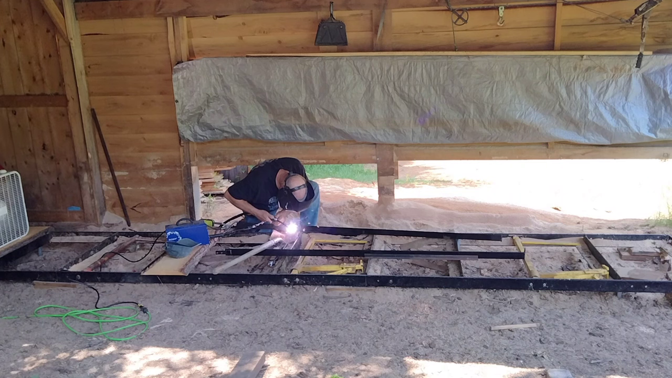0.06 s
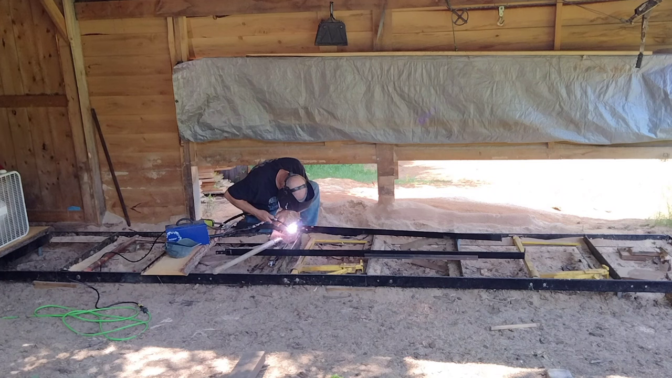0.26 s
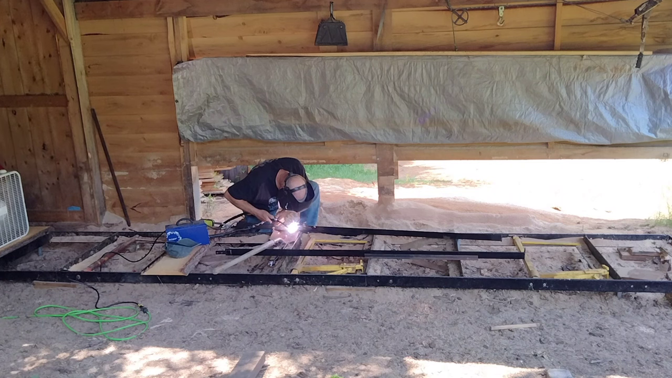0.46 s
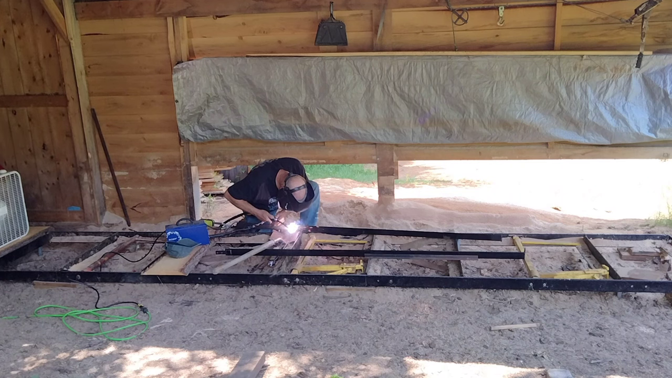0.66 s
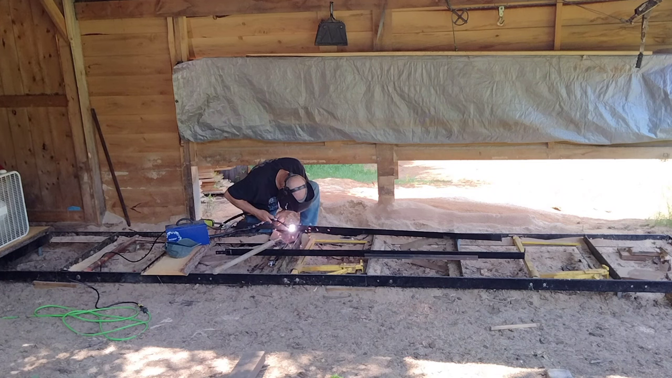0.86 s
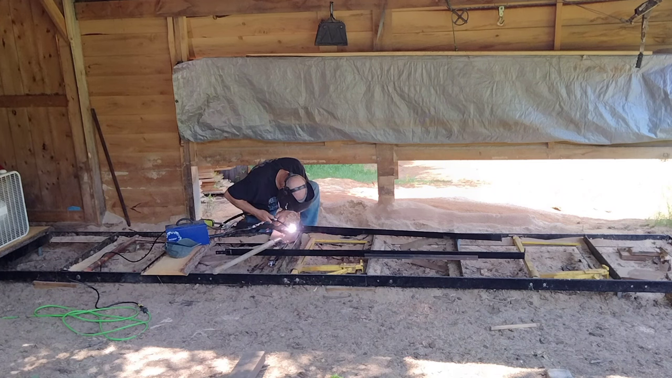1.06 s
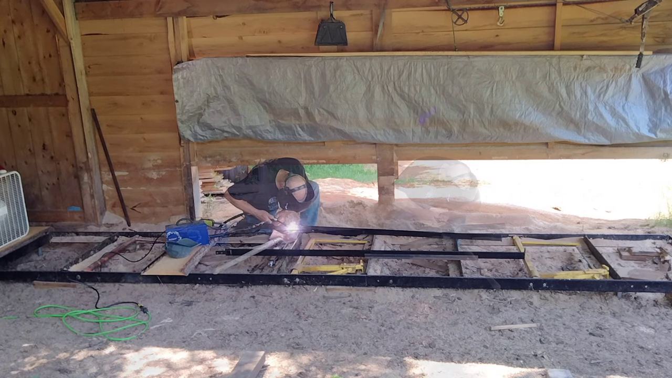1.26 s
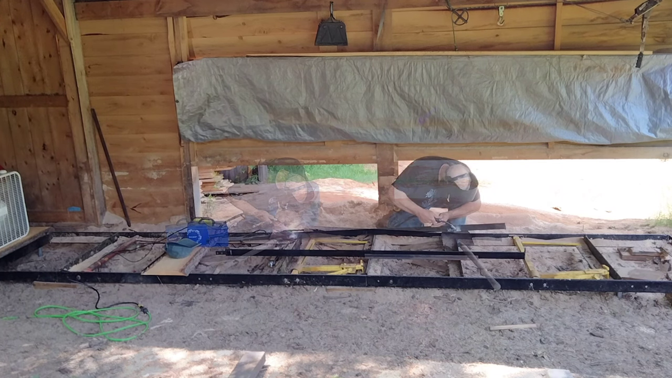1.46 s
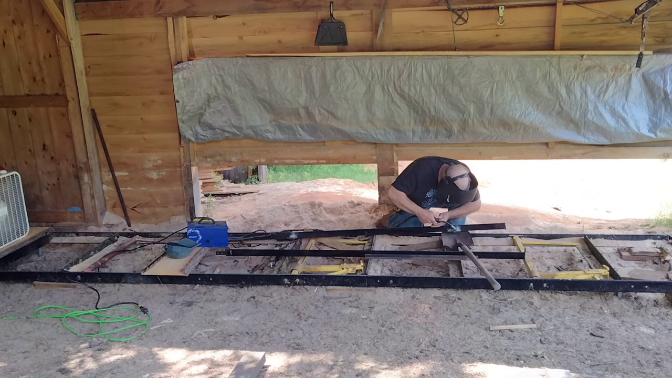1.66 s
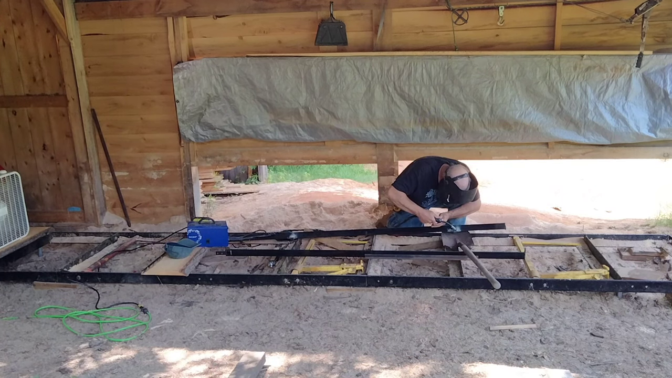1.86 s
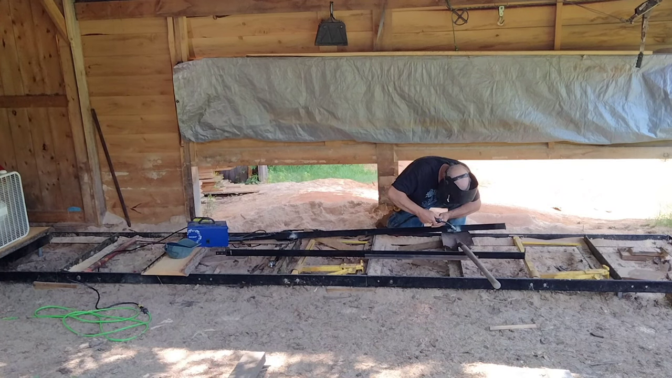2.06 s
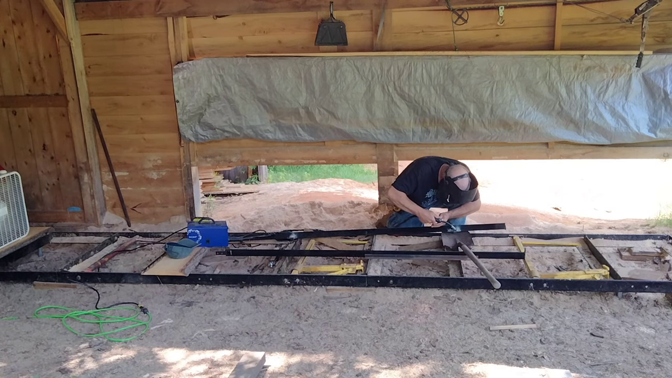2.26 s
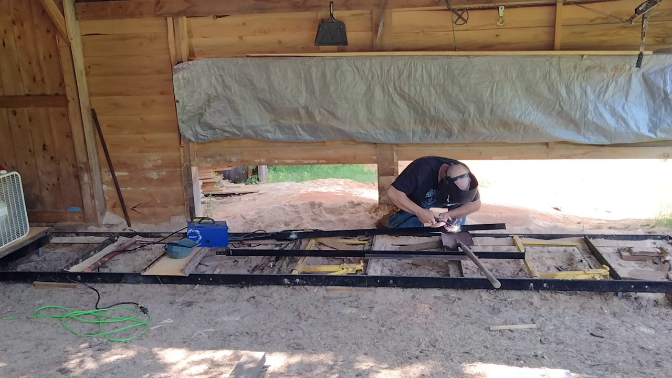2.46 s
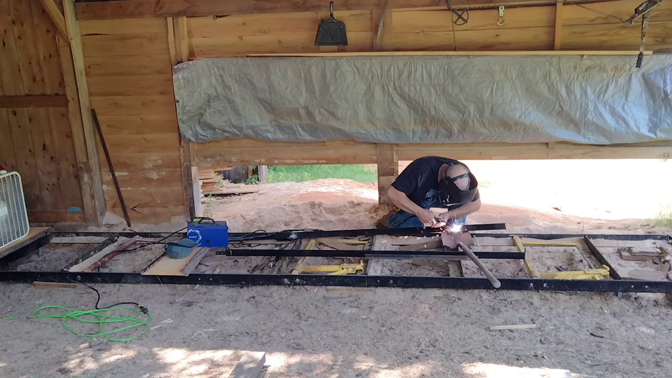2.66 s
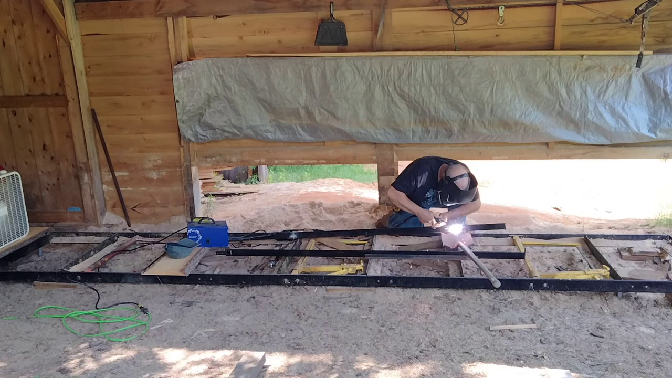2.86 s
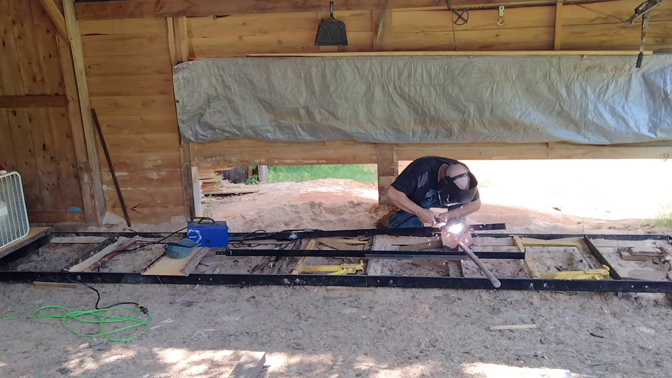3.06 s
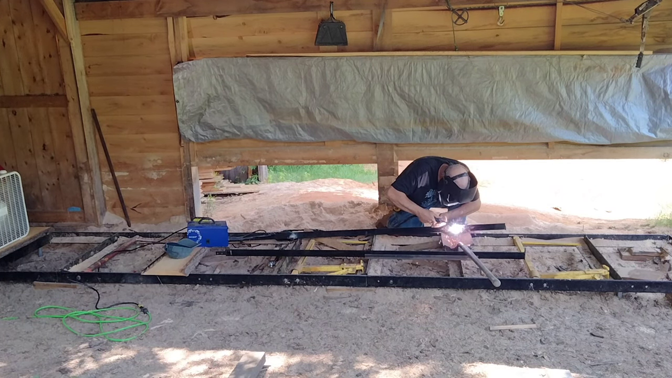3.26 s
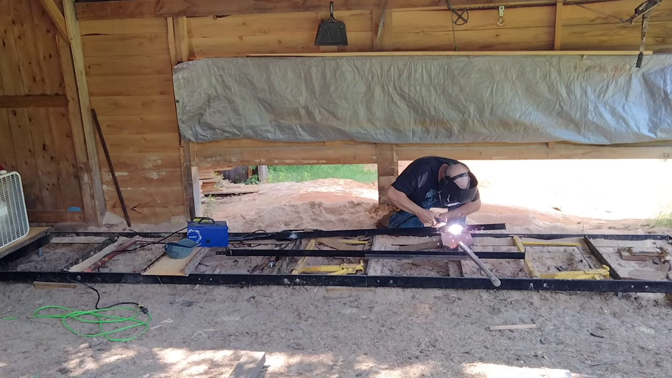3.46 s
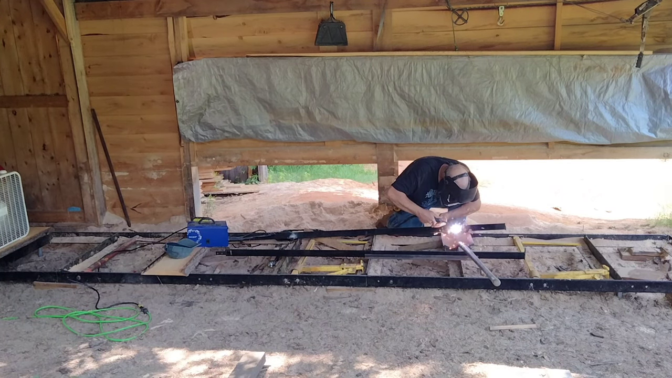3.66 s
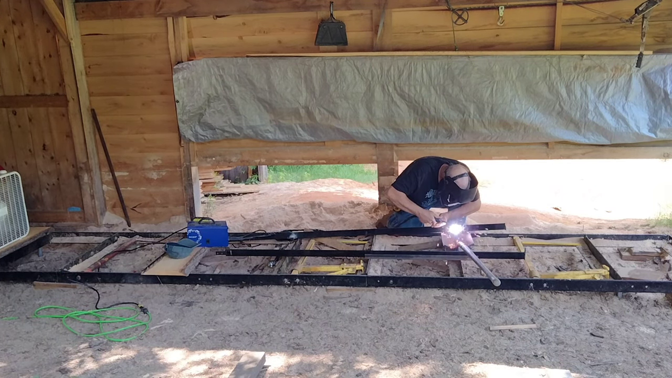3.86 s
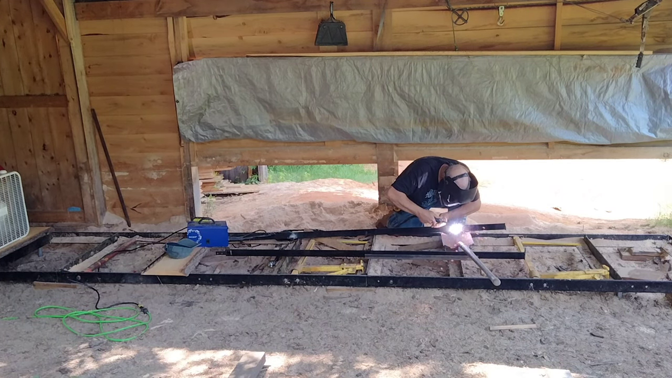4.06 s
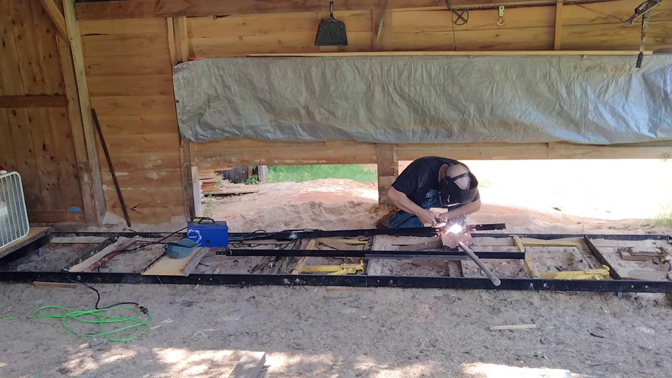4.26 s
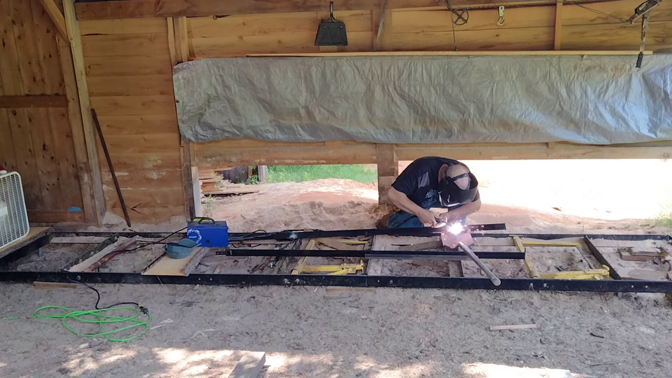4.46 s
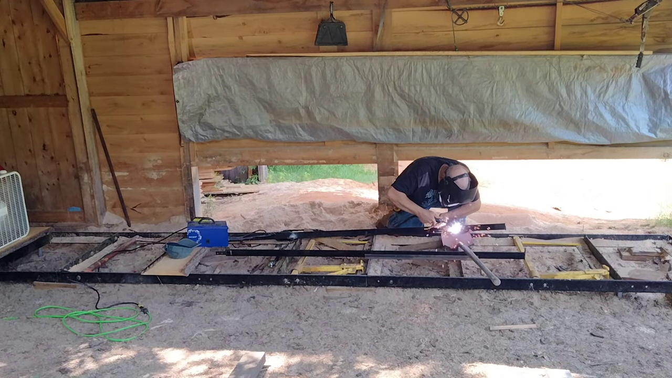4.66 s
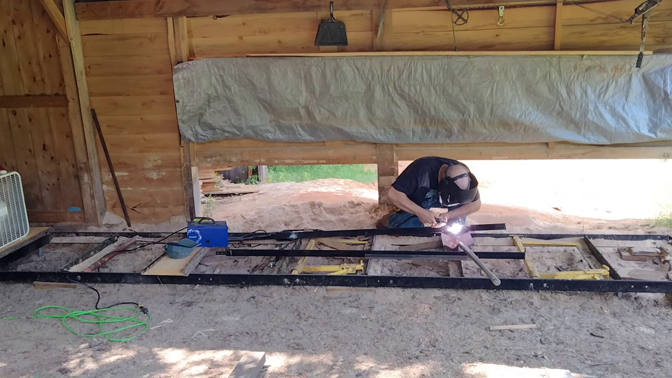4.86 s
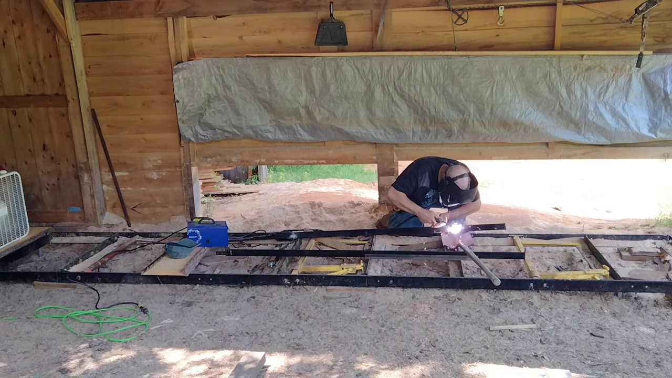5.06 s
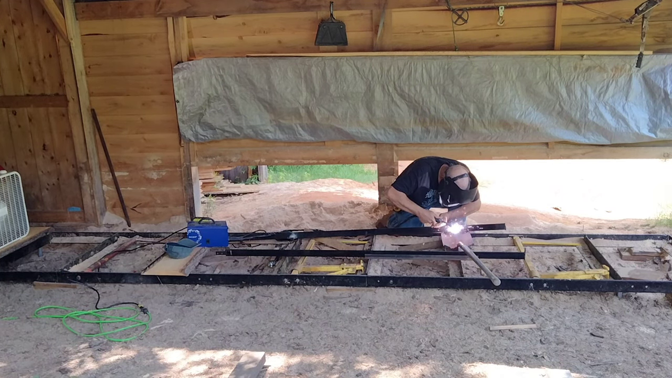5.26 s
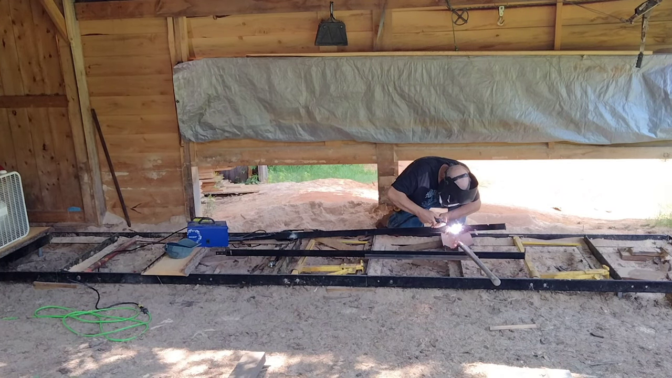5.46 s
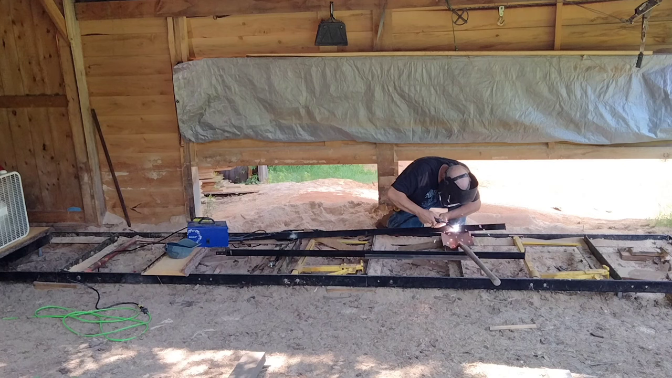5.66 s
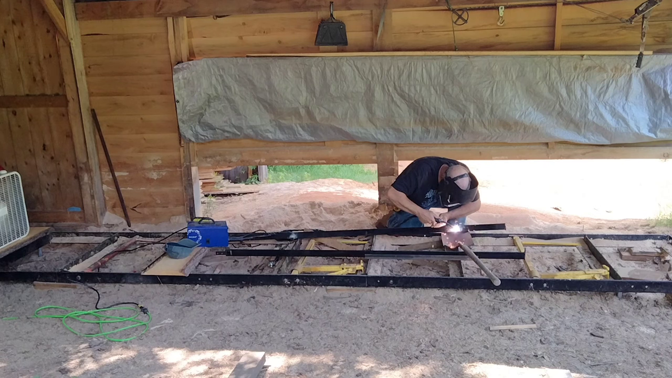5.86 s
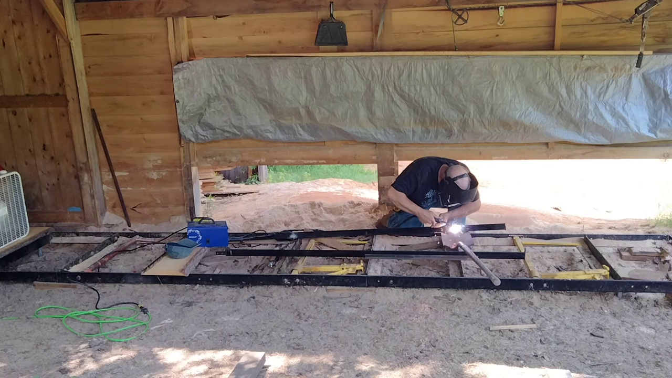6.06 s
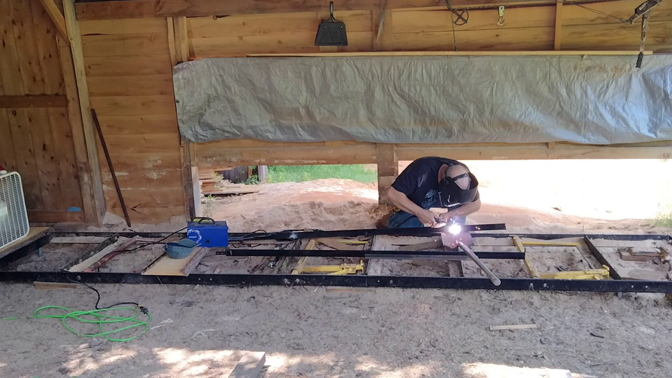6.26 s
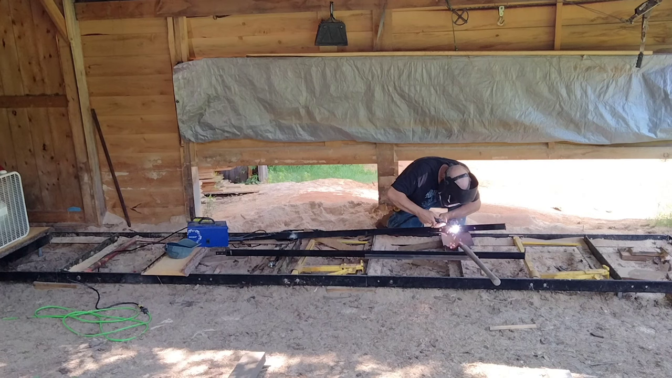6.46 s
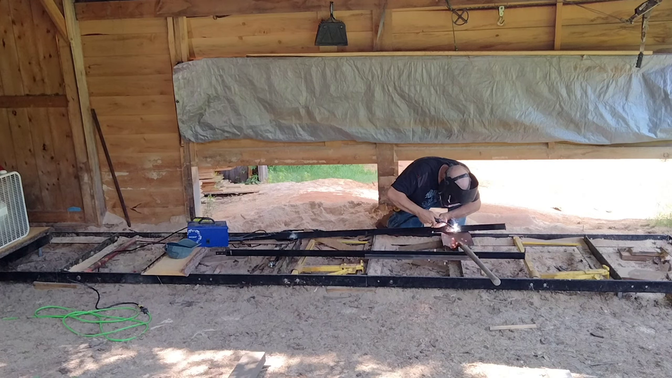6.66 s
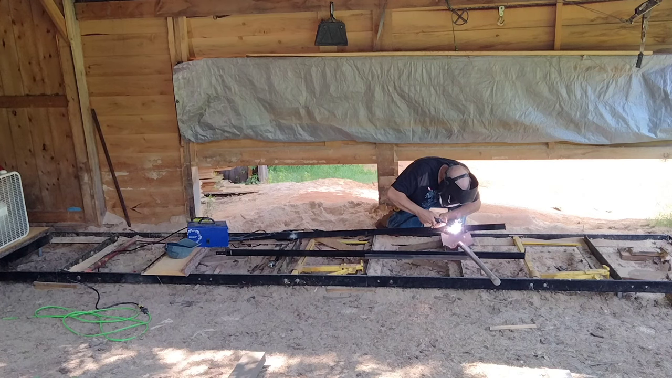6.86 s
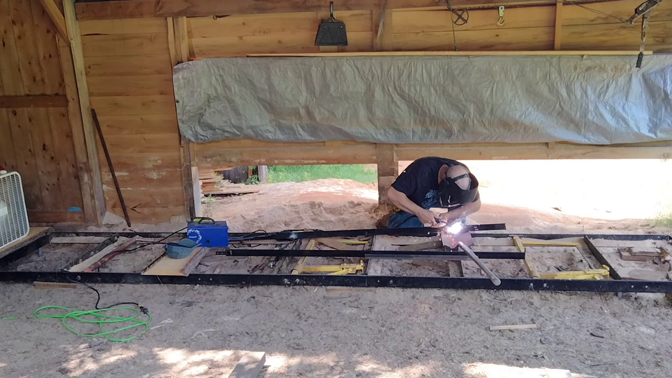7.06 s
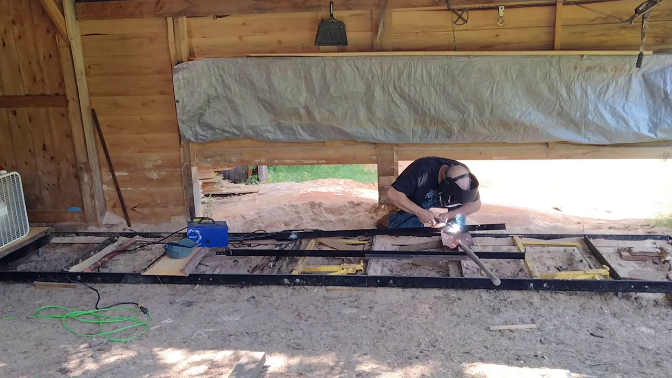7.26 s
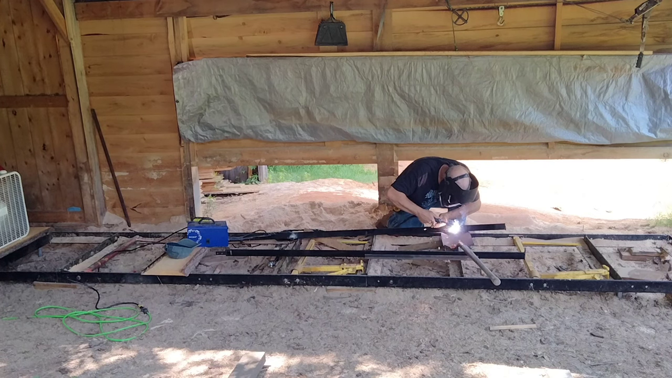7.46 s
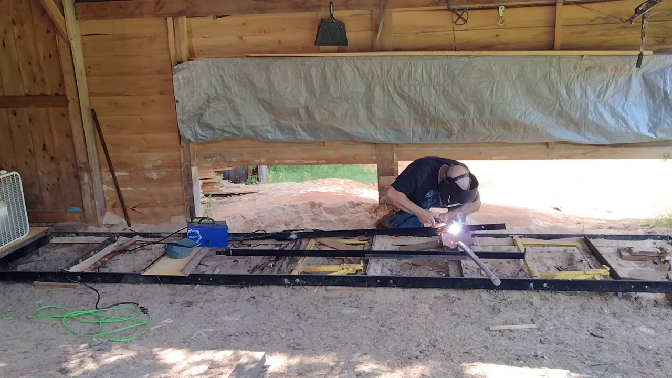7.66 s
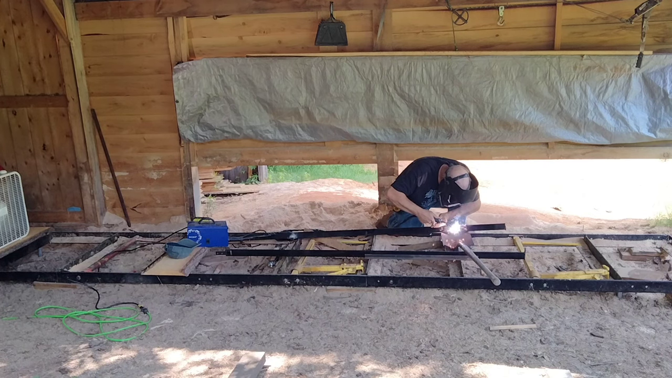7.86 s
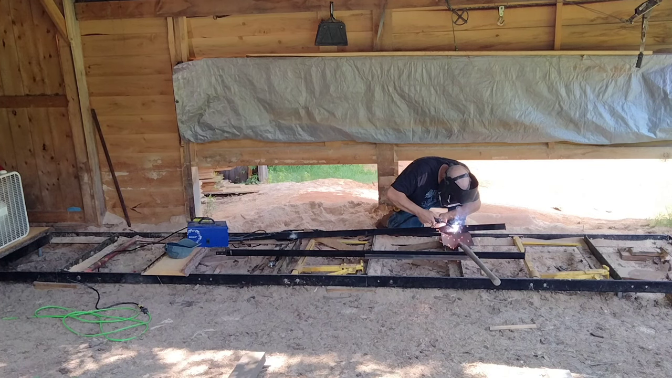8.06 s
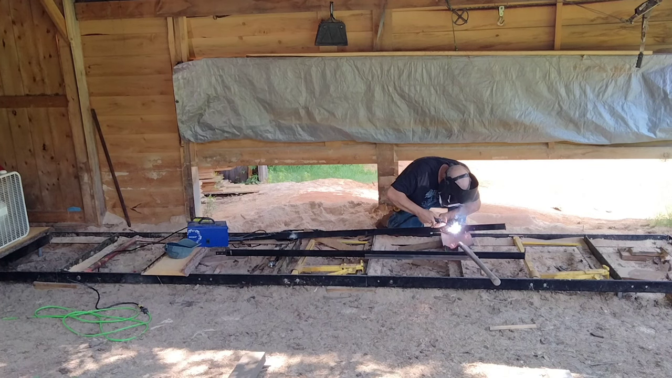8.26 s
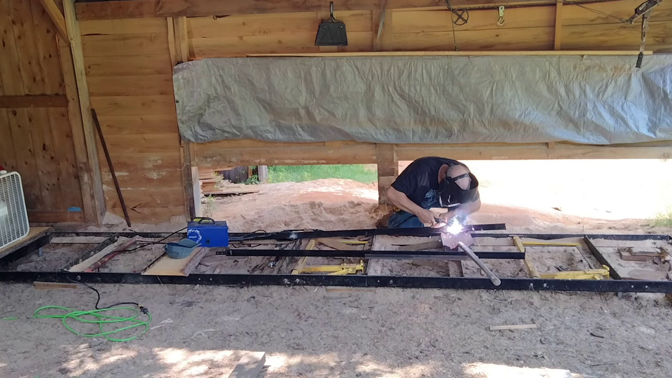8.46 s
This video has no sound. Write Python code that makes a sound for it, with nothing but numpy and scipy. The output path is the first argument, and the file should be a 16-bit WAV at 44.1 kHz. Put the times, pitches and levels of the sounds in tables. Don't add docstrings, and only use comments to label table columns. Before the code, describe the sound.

From the start a welding arc burns with a bright, uneven hiss, dense crackle and sharp little snaps; four tiny falling bird peeps come in the first 0.4 seconds. A low unsteady transformer hum, faint fan whine and soft traffic rumble lie beneath. From about 1.2 the hiss weakens, fading out by 1.9. In the gap a distant vehicle's low drone is strongest near 2.0, and a thin gliding bird whistle sounds at 2.35-2.45. At 2.49 the rod strikes with a hard crack and a louder bead begins, flaring around 3.0 and running to 8.5, faltering and brightening as hands shade it. Droplets knock and ring the steel, busiest at 2.5-3.1, with wet little cracks. The vehicle drops in pitch around 2.8 and recedes. Wavering low road drones surface around 5.0-5.7 and 6.3-7.7; slag clicks dully at 5.9. Short wooden barn decay, moderately distant stereo pickup.

```python
import sys
import numpy as np
from scipy import signal
from scipy.fft import rfft, irfft, next_fast_len
from scipy.io import wavfile

SR = 44100
rng = np.random.default_rng(int(sys.argv[2]) if len(sys.argv) > 2 else 0)


def unload_audio(sound):
    columns = np.transpose(np.atleast_2d(sound))
    steps = np.round(np.clip(columns, -1, 1) * 32767)
    wavfile.write(sys.argv[1], SR, steps.astype(np.int16))


def gain_from_db(level_db):
    decades = np.asarray(level_db, float) / 20
    return 10 ** decades


N = 376173


def rms_one(x):
    return x / np.sqrt(np.mean(x ** 2) + 1e-20)


def in_time(rows):
    s, *columns = np.transpose(rows)
    t = np.arange(N) / SR
    return [np.interp(t, s, c) for c in columns], (t >= s[0]) & (t <= s[-1])


def at_hz(rows, column, hz):
    rows = np.array(rows)
    return np.interp(np.log(hz + 1), np.log(rows[:, 0]), rows[:, column])


def drift(rate):
    r = np.exp(-2 * np.pi * rate / SR)
    noise = rng.standard_normal(N + SR)
    return rms_one(signal.lfilter([1], [1, -2 * r, r * r], noise)[SR:])


def hump(s, rise_s, fall_s):
    return np.interp(np.arange(N) / SR, [s - abs(rise_s), s, s + abs(fall_s)], [0, 1, 0])


def band(x, low_hz, high_hz):
    return signal.sosfilt(signal.butter(4, [low_hz, high_hz], "band", fs=SR, output="sos"), x)


def part(x, edge_hz, kind):
    return signal.sosfiltfilt(signal.butter(2, edge_hz, kind, fs=SR, output="sos"), x)


def dying(x, t60_s):
    return signal.lfilter([1], [1, -gain_from_db(-60 / (t60_s * SR))], x + 1e-18)


def clicks(events):
    out = np.zeros(N)
    s, db = np.transpose(events)
    out[(s * SR).astype(int)] = gain_from_db(db) * (-1.) ** np.arange(len(s))
    return out


def tone(hz, level_db, rough_db):
    wave = np.sin(2 * np.pi * np.cumsum(hz) / SR)
    return np.sqrt(2) * gain_from_db(level_db + rough_db * drift(9.1)) * wave


def sputter(per_s, spread_db):
    clump_db = 2.8
    born = rng.random(N) < per_s * gain_from_db(clump_db * drift(25)) / SR
    size = gain_from_db(spread_db * np.minimum(rng.exponential(1, N), 3))
    return rms_one(born * size * rng.choice([-1, 1], N))


def barn(count):
    t60_s, tail_db = .1, -11
    t = np.arange(count) / SR
    tail = rng.standard_normal((2, count)) * gain_from_db(-60 * t / t60_s) * (t > .0018)
    tail *= gain_from_db(tail_db) / np.sqrt(np.sum(tail ** 2, axis=1, keepdims=True))
    tail[:, 0] = 1
    return tail / np.sqrt(1 + gain_from_db(2 * tail_db))


def heard(x, path, room):
    size = next_fast_len(N + SR // 2)
    hz = np.arange(size // 2 + 1) * SR / size
    lead = np.interp(hz, [0] + [p[0] for p in path], [0] + [p[3] for p in path])
    ports = gain_from_db([at_hz(path, 1, hz), at_hz(path, 2, hz)])
    ports = ports * np.exp(.5j * lead * [[1], [-1]]) * rfft(room, size)
    middle = ports.mean(axis=0)[(hz > 4000) & (hz < 11000)]
    gain = np.sqrt(np.mean(np.abs(middle) ** 2) * 14000 / SR)
    return irfft(rfft(x, size) * ports / gain, size)[:, :N]


# (lowest_s, depth_db,
# sag_s, recovery_s)
ARC_FALTERS = [(.63, 2, 0.087, 0.011), (.7, -4, 0.024, 0.0061), (.893, 3.5, 0.076, .004),
               (1.11, 4.5, 0.029, 0.034), (2.492, 2, .003, 0.027), (2.579, 6, 0.065, 0.0033),
               (2.587, -4, .004, 0.012), (3.183, 6, 0.098, 0.002), (3.831, 12, 0.018, 0.0042),
               (4.38, 8.5, 0.031, 0.018), (4.8, 3.5, 0.02, 0.021), (5.61, 4.5, 0.07, 0.01),
               (5.829, 9, 0.07, 0.0045), (6.203, 5.5, 0.02, 0.012), (6.72, 6.5, 0.24, 0.073),
               (6.95, 3.5, 0.11, 0.015), (7.31, 6, 0.13, 0.07), (8.11, 4, .02, 0.1),
               (8.24, 8, 0.046, 0.047), (8.39, 3.5, 0.041, 0.026)]


def burning(bead):
    (level_db,), lit = in_time(bead)
    falters = sum(db * hump(s, sag, back) for s, db, sag, back in ARC_FALTERS)
    return level_db - falters + 0.5 * drift(10), lit


# (low_hz, high_hz)
HAND_SHADED = [3000, 5800]


def arc(bead, snaps, grain_db, scattered_db, snap_db, top_db, straight):
    level_db, lit = burning(bead)
    flicker = gain_from_db(0.78 * drift(30) + 2.3 * drift(360))
    spatter = gain_from_db(grain_db) * sputter(per_s=500, spread_db=4.5)
    direct = rms_one(rng.standard_normal(N) * flicker + spatter)

    scattered = gain_from_db(scattered_db) * rms_one(rng.standard_normal((2, N)) * flicker)
    straight = np.clip(straight, 0, 1)
    lost = gain_from_db(2 * scattered_db) * (1 - (1 - straight) ** 2)
    scattered = scattered - straight * part(scattered, HAND_SHADED, "band")
    direct = direct + (np.sqrt(1 + lost) - 1) * part(direct, HAND_SHADED, "band")

    burn = rms_one(direct + scattered)
    burn = burn + part(burn, 12000, "high") * (gain_from_db(top_db + 1.6 * drift(8.9)) - 1)
    burn = burn + part(burn, [1700, 3600], "band") * (gain_from_db(2.5 * drift(5.0)) - 1)

    cracks = clicks(snaps)
    fizz = np.roll(dying(np.abs(cracks), t60_s=.005), 1) * rng.choice([-1, 1], N)
    snapping = part(cracks + .3 * fizz, [2500, 12500], "band")
    spark = burn * gain_from_db(level_db) * lit + gain_from_db(snap_db) * snapping
    return signal.sosfilt(signal.butter(2, 650, "high", fs=SR, output="sos"), spark)


# (time_s, arc_level_db)
FIRST_BEAD = [(0.0, -34), (0.048, -30.5), (1.154, -35), (1.188, -34.5), (1.466, -38), (1.56, -40.5),
              (1.66, -43.5), (1.76, -47.5), (1.854, -52), (1.892, -60), (1.93, -69)]
# (time_s, peak_db)
FIRST_SNAPS = [(0.0493, -15), (0.0566, -10), (0.0769, -16), (0.0819, -15), (0.0875, -13), (0.1041, -14),
               (0.1376, -14), (0.1506, -15), (0.1663, -17), (0.2041, -16), (0.2144, -14), (0.2258, -16),
               (0.2514, -16), (0.2773, -17), (0.287, -14), (0.3112, -16), (0.4072, -16), (0.4197, -15),
               (0.442, -16), (0.4619, -16), (0.5023, -16), (0.5148, -17), (0.5423, -17), (0.5527, -17),
               (0.5701, -18), (0.5977, -19), (0.6415, -15), (0.65, -15), (0.706, -18), (0.7095, -19),
               (0.7125, -16), (0.7233, -17), (0.7794, -19), (0.8582, -21), (0.8977, -14), (0.942, -18),
               (1.0035, -19), (1.1225, -20), (1.2552, -20), (1.2678, -20), (1.3481, -19), (1.3828, -21),
               (1.4069, -20), (1.4716, -18), (1.5048, -22), (1.5266, -23), (1.5341, -21)]
# (pitch_hz, left_db, right_db, left_lead_rad)
FIRST_PATH = [(570, -17, -17, -0.5), (1090, -15.5, -15.5, -1), (1290, -25.5, -27.5, -2),
              (1920, -11.5, -12, 0.6), (2400, -25, -24, 0), (2800, -18.5, -17.5, -1), (2920, -18, -19, -2),
              (3300, -17.5, -18.5, -0.8), (3900, -16, -16, -1.3), (5160, -11, -9.5, -1.5),
              (6300, -15.5, -9, -1.5), (7600, -16.5, -11, 1.5), (9320, 1, -11, -1.5), (10670, -8, -10, -2),
              (12400, -11.5, -12.5, -2), (14300, -7, -6, -2.5), (15700, -5, -8, -2.5)]


def first_bead(room):
    sound = arc(FIRST_BEAD, FIRST_SNAPS, grain_db=-6.5, scattered_db=-14.0,
                snap_db=2.0, top_db=-3.0, straight=0.77)
    return heard(sound, FIRST_PATH, room)


# (time_s,
# rumble_db, hum_hz, hum_db)
YARD_AND_HUM = [(0.0, -50.5, 125.2, -56), (1.24, -49, 126.1, -54.5), (1.52, -48, 122, -54),
                (2.28, -46, 120, -56), (2.42, -46, 128, -57), (2.54, -45.5, 119.2, -79),
                (2.75, -49, 139.3, -55), (3.73, -51.5, 132, -57), (5.61, -47, 124.7, -54),
                (5.7, -50.5, 139.9, -61), (7.29, -48, 125.2, -50.5), (7.36, -48, 136.1, -52.5),
                (8.41, -49.5, 128.7, -59), (8.53, -50, 122.6, -49)]
# (pitch_hz, level_db per Hz)
RUMBLE_COLOUR = [(20, -41), (35, -11), (100, -7), (170, -1), (300, -3), (450, -8.5), (1300, -15),
                 (1700, -18), (3500, -23), (4700, -28), (9500, -35.5), (16000, -42)]
# (pitch_hz, likeness from -1 to 1)
PORT_LIKENESS = [(60, 0.48), (150, 0.85), (380, 0.84), (950, 0.39), (1900, -0.5), (2900, -0.25),
                 (3900, 0.43), (5980, 0.05), (15000, -0.2)]


def rumble():
    (level_db, _, _), _ = in_time(YARD_AND_HUM)
    hz = np.arange(N // 2 + 1) * SR / N
    alike = np.clip(at_hz(PORT_LIKENESS, 1, hz), -1, 1)
    mid, side = rfft(rng.standard_normal((2, N))) * gain_from_db(at_hz(RUMBLE_COLOUR, 1, hz))
    ports = np.sqrt(1 + alike) * mid + np.sqrt(1 - alike) * side * [[1], [-1]]
    ports[0] *= gain_from_db(6.4 * np.exp(-((hz - 9400) / 900) ** 2))
    road = (hz > 135) & (hz < 430)
    lows, rest = irfft([ports * road, ports * ~road], N)
    air_db = -50 + 1.3 * (level_db + 50)
    return (gain_from_db(air_db) * rest + gain_from_db(level_db - 2.0) * lows) / np.std(lows.mean(axis=0))


def hum():
    (_, hz, level_db), _ = in_time(YARD_AND_HUM)
    return tone(hz * (1 + .012 * drift(6.8)), level_db - .7, rough_db=4)


# (pitch_hz, level_db)
FAN_WHINE = [(1421, -63.5)]


def fan():
    return sum(tone(hz * (1 + 0.00308 * drift(5.68)), db, rough_db=3.5) for hz, db in FAN_WHINE)


# (middle_s, pitch_hz, level_db)
BIRD_PEEPS = [
    (.101, 3700, -41),
    (.134, 3800, -38),
    (.277, 3550, -40),
    (.357, 3850, -41),
]


def peeps():
    half_s, fall_hz_per_s = .010, 15000
    out, t = np.zeros(N), np.arange(-half_s, half_s, 1 / SR)
    for s, hz, db in BIRD_PEEPS:
        at = int((s - half_s) * SR)
        whistle = np.sin(2 * np.pi * (hz - fall_hz_per_s * t / 2) * t)
        out[at:at + len(t)] += gain_from_db(db) * np.hanning(len(t)) * whistle
    return out


# (time_s, base_pitch_hz, level_db)
PASSING_VEHICLE = [
    (1.2, 75.4, -59),
    (1.6, 75, -56.5),
    (2.0, 75.9, -51),
    (2.44, 75.75, -54),
    (2.66, 75.3, -55.5),
    (2.8, 72.1, -56),
    (2.95, 70.6, -63),
    (3.3, 69.1, -64),
    (4.1, 68, -79),
]
# (multiple, level_db)
ENGINE_ORDERS = [(2, -1), (3, -8), (4, -0.5), (5, -7)]


def vehicle():
    (hz, level_db), near = in_time(PASSING_VEHICLE)
    return near * sum(tone(k * hz, level_db + db, rough_db=3.0) for k, db in ENGINE_ORDERS)


# (start_s, length_s, pitch_hz, level_db)
ROAD_DRONES = [
    (5.048, 0.62, 186, -53),
    (6.254, 0.3, 165, -52),
    (6.448, 0.42, 193, -50.5),
    (6.95, 0.19, 197, -50),
    (7.28, 0.23, 184, -45.5),
    (7.42, 0.15, 144, -51),
    (7.502, 0.24, 185, -52),
    (1.95, 0.3, 200, -51),
    (4.107, 0.3, 185, -55),
]


def drone():
    out = 0
    for s, long, hz, db in ROAD_DRONES:
        swell = np.sqrt(hump(s + long / 2, long / 2, long / 2))
        out = out + tone(hz * (1 + 0.0303 * drift(4.06)), db, rough_db=4.0) * swell
    return out


# (time_s, pitch_hz, level_db)
BIRD_CALL = [
    (2.33, 3593, -70),
    (2.36, 3712, -57),
    (2.374, 4193, -49),
    (2.384, 4040, -54),
    (2.392, 3466, -52),
    (2.412, 3350, -51),
    (2.422, 3450, -48),
    (2.434, 4190, -48),
    (2.455, 4300, -62),
]


def bird():
    (hz, level_db), sings = in_time(BIRD_CALL)
    note = tone(hz, level_db, rough_db=-3.0) * sings
    note = note + 0.25 * np.roll(note, 480) + 0.16 * np.roll(note, 930)
    return np.array([note, np.roll(note, 3)]) * gain_from_db([[.5], [1.5]])


# (time_s, arc_level_db)
SECOND_BEAD = [(2.488, -32), (2.8, -30.5), (3.03, -26), (3.25, -31), (3.7, -31), (4.3, -28), (4.8, -29),
               (5.4, -28), (5.9, -31.5), (6.1, -29.5), (6.42, -29), (6.8, -28.5), (7.5, -28.5), (8.05, -30),
               (8.3, -29.5), (8.53, -32.5)]
# (time_s, peak_db)
ARC_STRIKE = [
    (2.4897, -8),
    (2.4941, -14),
]
# (time_s, peak_db)
SECOND_SNAPS = [(2.557, -15), (2.583, -14), (2.621, -14), (2.6984, -13), (2.7306, -13), (2.7454, -8),
                (2.7517, -11), (2.7878, -16), (2.8107, -12), (2.822, -12), (2.8262, -14), (2.8374, -13),
                (2.843, -10), (2.8494, -12), (2.8612, -11), (2.9551, -13), (2.966, -13), (2.9968, -11),
                (3.0228, -11), (3.0309, -11), (3.0959, -12), (3.1125, -14), (3.1212, -15), (3.1291, -15),
                (3.1414, -14), (3.1581, -19), (3.1851, -9), (3.2102, -12), (3.2318, -15), (3.2868, -14),
                (3.3818, -13), (3.4063, -15), (3.4148, -15), (3.4238, -15), (3.4303, -15), (3.4504, -15),
                (3.487, -15), (3.5741, -14), (3.5861, -15), (3.6291, -11), (3.6332, -15), (3.6782, -14),
                (3.72, -12), (3.84, -12), (3.9158, -13), (3.9666, -13), (4.0329, -14), (4.0497, -14),
                (4.0669, -13), (4.0732, -10), (4.0931, -15), (4.1974, -11), (4.2481, -13), (4.2539, -13),
                (4.3062, -12), (4.3201, -11), (4.367, -15), (4.393, -15), (4.4621, -13), (4.468, -12),
                (4.5387, -13), (4.5602, -11), (4.5645, -12), (4.7244, -14), (4.7446, -14), (4.7529, -14),
                (4.8143, -15), (4.8355, -14), (4.8447, -14), (4.8837, -14), (4.8914, -12), (4.9344, -12),
                (4.9458, -14), (4.952, -12), (5.0038, -9), (5.0285, -12), (5.0507, -11), (5.1019, -13),
                (5.1703, -12), (5.2043, -13), (5.298, -14), (5.3296, -14), (5.3438, -12), (5.3506, -13),
                (5.3804, -13), (5.3883, -13), (5.3981, -10), (5.4041, -11), (5.4112, -12), (5.4288, -12),
                (5.4335, -12), (5.4408, -14), (5.4514, -13), (5.4756, -12), (5.5018, -14), (5.5101, -13),
                (5.5398, -13), (5.6222, -15), (5.6641, -14), (5.6886, -14), (5.7037, -14), (5.7795, -13),
                (5.8342, -16), (5.9151, -15), (5.9219, -16), (5.9705, -15), (6.0749, -13), (6.0909, -14),
                (6.1389, -13), (6.1461, -14), (6.1823, -14), (6.2139, -15), (6.2295, -13), (6.3262, -12),
                (6.4105, -11), (6.4271, -13), (6.4498, -13), (6.4969, -12),
                (6.5054, -13), (6.5869, -16), (6.5952, -14), (6.6247, -15), (6.6605, -17), (6.6894, -17),
              (6.6948, -19), (6.7041, -14), (6.7466, -16), (6.7632, -16), (6.771, -15), (6.8177, -13),
              (6.8705, -12), (6.8893, -15), (6.895, -15), (6.9163, -13), (6.9263, -14), (6.9432, -16),
              (6.959, -15), (7.0623, -11), (7.1078, -12), (7.1204, -14), (7.1294, -13), (7.1556, -13),
              (7.1616, -13), (7.2294, -14), (7.2371, -16), (7.4182, -12), (7.4776, -14), (7.5017, -12),
              (7.529, -14), (7.5494, -13), (7.572, -11), (7.5816, -15), (7.5991, -14), (7.6303, -13),
              (7.6695, -10), (7.7879, -14), (7.8309, -14), (7.861, -11), (7.9161, -16), (7.9269, -16),
              (7.9363, -13), (7.9581, -15), (8.0326, -14), (8.0758, -14), (8.0849, -15), (8.0934, -15),
              (8.1293, -16), (8.1407, -16), (8.2092, -16), (8.22, -14), (8.2763, -13), (8.2891, -13),
              (8.3037, -13), (8.3264, -13), (8.4139, -13), (8.4746, -15)]
# (time_s, share of hiss that comes straight)
HANDS_CLEAR = [(2.5, .05), (2.58, .3), (2.65, 1), (2.72, .3), (2.95, .55), (3.1, .1), (3.3, .7), (3.4, .35),
               (3.85, .2), (3.95, .85), (4.05, .2), (4.25, .45), (4.5, .15), (4.75, .6), (4.95, .5),
               (5.35, .8), (5.45, .3), (5.75, .95), (5.9, .5), (6.05, .35), (6.3, .85), (6.45, .15),
               (6.68, .25), (6.8, .95), (7.15, .3), (7.55, .9), (7.95, .9), (8.05, 1), (8.18, 1),
               (8.26, .25), (8.45, .6)]
# (pitch_hz, left_db, right_db, left_lead_rad)
SECOND_PATH = [(1680, -20.5, -18.5, 1.05), (1790, -24, -21, 1.13), (2400, -19, -16.5, 1.6),
               (2890, -23, -18.5, 1.5), (3950, -8.5, -6, 2.37), (5480, -1.5, 2, 3.18), (5970, -6, -2, 4.36),
               (7100, -11, -4, 5), (7950, -4.5, -3, 6.7), (8640, -2.5, -14, 8.1), (9840, 0.5, -8, 6.4),
               (10830, 1, -9, 7.14), (12300, -7.5, -7, 7.2), (13200, -6.5, -7, 8.3), (14500, -7, -3.5, 9.3),
               (15100, -3.5, -8, 10.8)]
# (time_s, left_minus_right_db)
HEAD_LEAN = [(2.5, -1), (3.25, -2), (3.75, 0), (5.6, 0), (6.25, -0.5), (7.75, 0), (8.5, -1)]


def second_bead(room):
    (straight,), _ = in_time(HANDS_CLEAR)
    (lean_db,), _ = in_time(HEAD_LEAN)
    sound = arc(SECOND_BEAD, ARC_STRIKE + SECOND_SNAPS, grain_db=-8.5,
                scattered_db=-1.5, snap_db=2.5, top_db=-0.7, straight=straight + .04 * drift(3.0))
    return heard(sound, SECOND_PATH, room) * gain_from_db(lean_db / 2 * [[1], [-1]])


# (peak_s, level_db, build_up_s)
SPATTER_SHOWERS = [(2.5, -45, 0.022), (2.76, -44, 0.13), (2.85, -42, 0.091), (2.98, -42.5, 0.14),
                   (3.16, -40, 0.13), (3.48, -37.5, 0.19), (3.86, -43, 0.091), (4.069, -42, 0.15),
                   (4.36, -50, 0.093), (4.65, -43.5, 0.24), (5.2, -45, 0.23), (5.45, -41.5, 0.31),
                   (6.1, -51, .1), (6.35, -53, 0.1), (6.78, -43, 0.036), (7.1, -45, 0.2), (7.62, -44, 0.12),
                   (8.3, -44, 0.062), (8.48, -36.5, 0.17)]


def showers():
    bare_db, fall_s = -50.5, 0.067
    swells = sum(gain_from_db(db) * hump(s, rise, fall_s) ** 2 for s, db, rise in SPATTER_SHOWERS)
    return 20 * np.log10(gain_from_db(bare_db) + swells)


# (time_s, peak_db)
DROPLETS = [(2.487, -24.5), (2.582, -21), (2.699, -28), (2.745, -14), (2.788, -23), (2.84, -19),
            (2.973, -33), (3.119, -21), (3.464, -33), (3.718, -27), (3.844, -22), (4.072, -21),
            (4.332, -30), (4.649, -32), (4.979, -24), (5.18, -23), (5.433, -19), (6.745, -42),
            (7.14, -24.5), (7.328, -25.5), (7.629, -19.5), (7.754, -24), (8.411, -29)]
# (pitch_hz, level_db, t60_s)
IRON_MODES = [(837, -11.5, 0.24), (955, -6.5, 0.18), (1193, -0.5, 0.045), (1325, -9.5, 0.032),
              (1437, 3.5, 0.067), (1502, -3, 0.063), (1619, -3.5, 0.12)]


def ringing(blows, hz, r):
    w = 2 * np.pi * hz / SR
    return signal.lfilter([0, np.sin(w)], [1, -2 * r * np.cos(w), r * r], blows + 1e-18)


def steel(room):
    _, lit = in_time(SECOND_BEAD)
    murmur, knocks = 0, 0
    shake = sputter(per_s=400, spread_db=3.0)
    for hz, level_db, t60_s in IRON_MODES:
        r = gain_from_db(-60 / (t60_s * SR))
        blows = clicks([(s, db + rng.normal(0, 3)) for s, db in DROPLETS])
        murmur = murmur + gain_from_db(level_db) * ringing(shake, hz, r ** 2.5)
        knocks = knocks + gain_from_db(level_db) * ringing(blows, hz, r)
    iron = rms_one(murmur) * gain_from_db(showers() - 2.0) * lit + gain_from_db(-18.5) * knocks
    left, right = [signal.fftconvolve(iron, side)[:N] for side in room]
    return np.array([left, np.roll(right, 5)])


# (time_s, peak_db)
FIRST_SPLASH = (2.4897, -12)


def splashes():
    wet = dying(np.abs(clicks(DROPLETS + [FIRST_SPLASH])), t60_s=0.083)
    return gain_from_db(-9) * band(wet * rng.standard_normal(N), low_hz=2820, high_hz=4840)


# (time_s, level_db)
SLAG_TICK = (5.9295, -7)


def tick():
    return band(clicks([SLAG_TICK]), 80, 4000) * [[1], [.5]]


def scene():
    room = barn(count=SR // 4)
    welding = first_bead(room) + second_bead(room) + steel(room) + splashes() + tick()
    machine = hum() + fan()
    outside = rumble() + peeps() + vehicle() + drone() + bird()
    return welding + machine + outside


def top_cut(x):
    return signal.sosfilt(signal.butter(12, 15800, fs=SR, output="sos"), x)


def record(dry):
    return top_cut(dry)


dry = scene()
out = record(dry)
unload_audio(out)
```